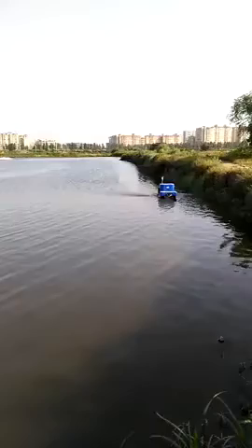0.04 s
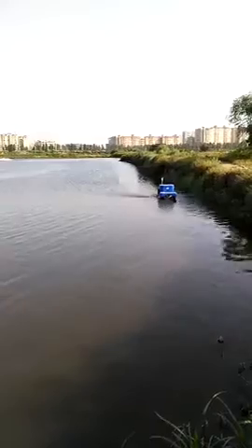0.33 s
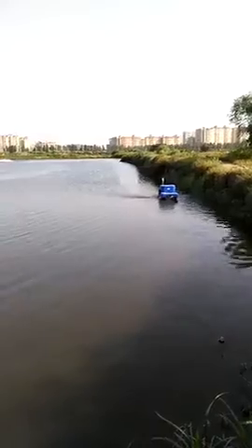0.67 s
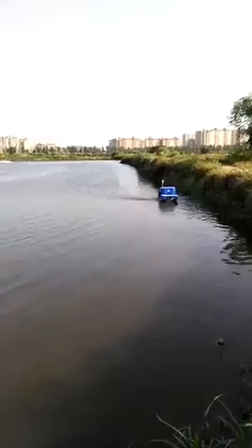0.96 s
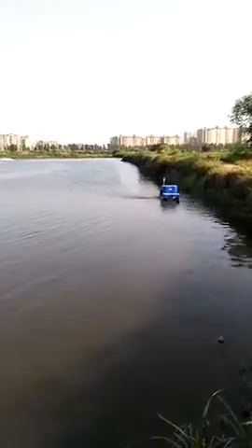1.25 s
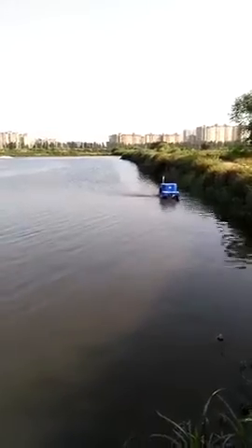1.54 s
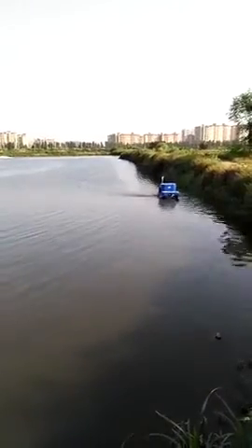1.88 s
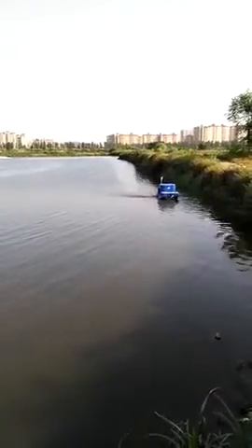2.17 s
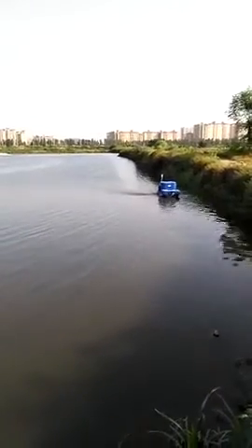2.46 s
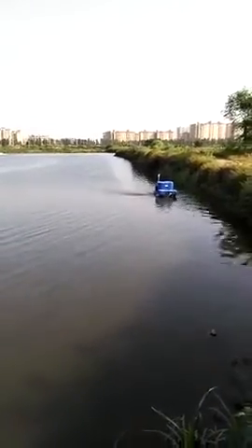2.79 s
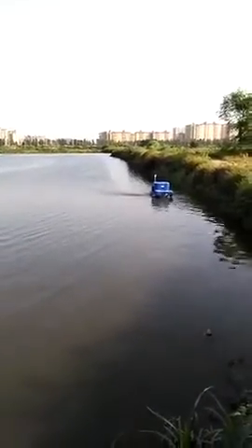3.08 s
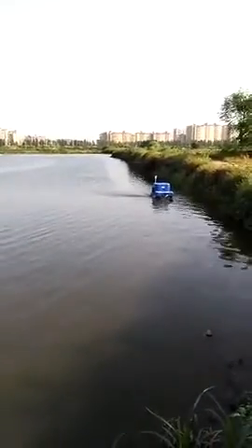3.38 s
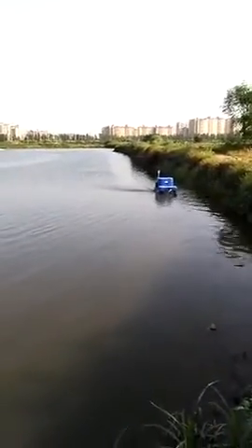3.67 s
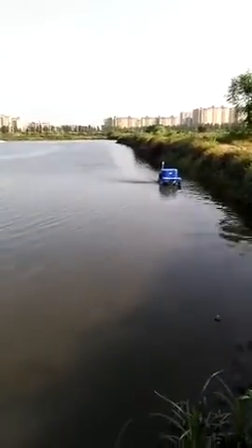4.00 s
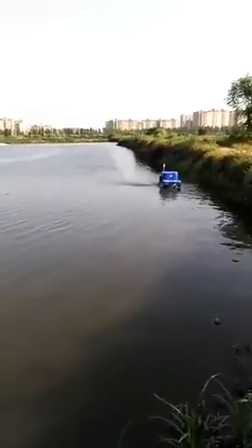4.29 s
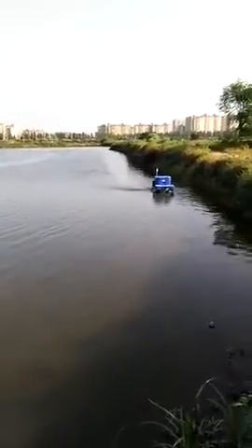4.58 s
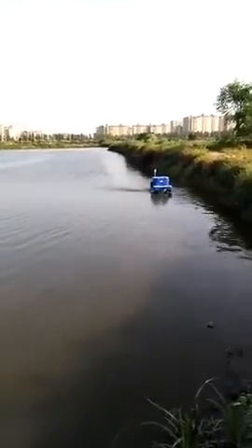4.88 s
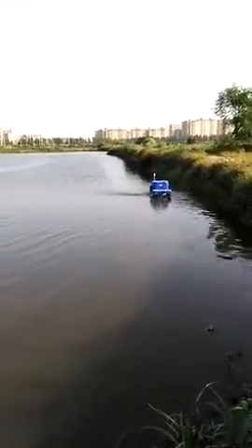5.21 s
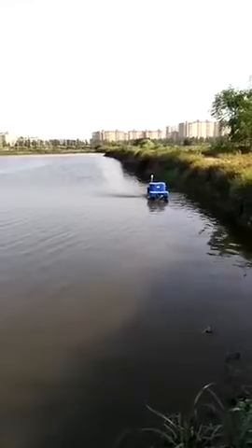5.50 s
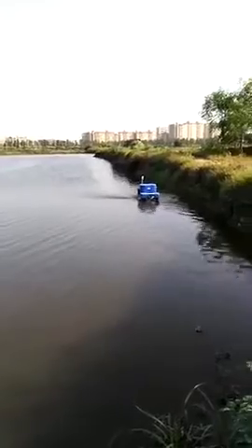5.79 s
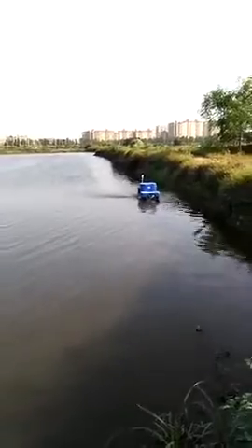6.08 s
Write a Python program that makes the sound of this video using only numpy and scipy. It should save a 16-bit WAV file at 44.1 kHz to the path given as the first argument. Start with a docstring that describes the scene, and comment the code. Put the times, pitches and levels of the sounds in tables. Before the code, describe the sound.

A motor-driven floating machine drones with a metallic chirr and a steady wash of spray on a pond, under low wind rumble.

```python
"""A steady wash of falling water, with a drone and a metallic chirr: a floating aerator on a pond.
Its jet falls back as lumps, drops and mist, close partials beat in its motor, and its shaft rubs
three times a turn and sets the metal ringing. Wind nudges the microphone on the bank, where insects
tick, grass rustles and water plops now and then. Midway the treble crackles faintly."""
import sys
import numpy as np
from scipy import signal
from scipy.fft import rfft, irfft
from scipy.io import wavfile
from scipy.ndimage import uniform_filter1d

SR = 44100
rng = np.random.default_rng(int(sys.argv[2]) if len(sys.argv) > 2 else 0)


def bounce(signal):
    """Save signal as a 16-bit WAV file at the path given by the first command-line argument."""
    frames = np.transpose(np.atleast_2d(signal))
    limited = np.clip(frames, -1, 1)
    pcm = np.round(limited * 32767).astype(np.int16)
    wavfile.write(sys.argv[1], SR, pcm)


N = 275625
T = np.arange(N) / SR
FREQ = np.maximum(np.fft.rfftfreq(N, 1 / SR), 1)


def undb(db):
    """Decibels to gain."""
    return 10 ** (np.asarray(db) / 20)


def unit(x):
    """Scale to rms 1."""
    return x / np.sqrt(np.mean(x ** 2))


def curves(table):
    """Automation lanes: each column after time_s, joined by straight lines."""
    times, *columns = np.transpose(table)
    return [np.interp(T, times, column) for column in columns]


def colour(x, points):
    """EQ a sound through points (freq_hz, gain_db), rolling off past the ends; rms 1."""
    hz, db = np.transpose(points)
    skirts = 1 / np.sqrt((1 + (hz[0] / FREQ) ** 4) * (1 + (FREQ / hz[-1] / 2) ** 4))
    eq = undb(np.interp(np.log(FREQ), np.log(hz), db))
    return unit(irfft(rfft(x) * skirts * eq, N))


def walk(rate_hz):
    """Smooth random modulator: noise low-passed at rate_hz; rms 1."""
    return unit(irfft(rfft(rng.standard_normal(N)) / (1 + (FREQ / rate_hz) ** 4) ** .5, N))


def angle(hz):
    """Phase that a frequency curve runs through."""
    return 2 * np.pi * np.cumsum(hz) / SR


def swells(table, attack_s, release_s):
    """Envelope of events (start_s, length_s, level_db) that rise, hold and die away."""
    return sum(undb(db) * np.clip((T - s) / attack_s, 0, 1)
               * np.exp(-np.maximum(T - s - length, 0) / release_s) for s, length, db in table)


def impacts(per_s, spread_db):
    """Random clicks of unequal size; rms 1."""
    hits = (rng.random(N) < per_s / SR) * np.sign(rng.standard_normal(N))
    return unit(hits * undb(spread_db * np.minimum(rng.exponential(size=N), 4)))


def blips(table, glide):
    """Swelling tones (centre_s, peak_db, pitch_hz, half_length_s); log pitch glides per half length."""
    out = np.zeros(N)
    for (s, db, hz, half), phase in zip(table, 2 * np.pi * rng.random(len(table))):
        near = np.abs(T - s) < 4 * half
        u = (T[near] - s) / half
        out[near] += undb(db) * np.exp(-u ** 2) * np.sin(angle(hz * np.exp(glide * u)) + phase)
    return out


# EQ of steady air on the microphone: freq_hz, gain_db
RUMBLE_EQ = [(25, -23), (35, -7.5), (50, -3.5), (70, -1), (100, -9), (150, -17), (250, -19), (500, -49)]
# strength of the breeze: time_s, level_db
BREEZE_LEVEL = [(0.6, -53), (3.6, -52.5), (4.5, -56), (5.3, -52), (6.25, -54)]
# eddies hitting the microphone: centre_s, peak_db, pitch_hz
WIND_THUMPS = [(0.676, -37.5, 56.5), (0.813, -38.5, 57.5), (0.925, -38.5, 64), (1.424, -34, 62.6),
               (1.557, -28, 65), (2.385, -32, 62), (2.597, -34.5, 59.6), (3.207, -43, 104),
               (3.504, -37, 71), (3.589, -31, 75), (3.667, -34.5, 77), (6.082, -42.5, 61.5),
               (6.17, -37.5, 98), (6.215, -42, 70)]


def wind(gust_db=3.5, flutter_db=-10.5, octave_db=-10, half_length_cycles=1.1):
    """A breeze rumbles on the microphone; single eddies thump it and break up into ragged flutter."""
    rumble = colour(rng.standard_normal(N), RUMBLE_EQ)
    rumble *= undb(curves(BREEZE_LEVEL)[0] + gust_db * walk(7.4))
    thumps = [(s, db, hz, half_length_cycles / hz) for s, db, hz in WIND_THUMPS]
    # the harder the thump, the more of its octave comes with it
    hardest_db = max(db for s, db, hz in WIND_THUMPS)
    octaves = [(s, 2 * db - hardest_db + octave_db, 2 * hz, half) for s, db, hz, half in thumps]
    eddies = sum(undb(db) * np.exp(-((T - s) / half / 2) ** 2) for s, db, hz, half in thumps)
    flutter_eq = [(48, 8.5), (100, 3), (200, -12), (400, -21.5), (1000, -42)]
    flutter = colour(rng.standard_normal(N), flutter_eq) * eddies * undb(flutter_db)
    return rumble + blips(thumps + octaves, glide=-0.066) + flutter


def crackle(start_s=2.74, end_s=3.54, pair_gap_s=0.0045, level_db=-81, count=12):
    """For a moment the treble crackles with tiny paired clicks."""
    slots = (np.arange(count) + rng.random(count)) / count
    clicks = np.zeros(N)
    clicks[((start_s + slots * (end_s - start_s)) * SR).astype(int)] = 1
    pairs = clicks + np.roll(clicks, int(pair_gap_s * SR))
    return colour(pairs, [(8000, -3), (11000, 0), (16000, -4)]) * undb(level_db)


# rustles on the bank: start_s, level_db, rise_s, decay_s, stalk_hz, treble_db
GRASS_RUSTLES = [(3.487, -44.5, 0.00065, 0.021, 4300, -0.5), (3.671, -49.5, 0.005, 0.026, 4250, 7),
                 (4.062, -46, 0.014, 0.04, 5140, 3), (4.605, -50, .003, 0.022, 3900, -10)]
# EQ of scraping blades: freq_hz, gain_db
GRASS_EQ = [(300, 9.5), (1000, 5.5), (2600, -14), (3600, -4), (5000, -2), (7000, -4), (10000, -6),
            (12000, -10), (15500, -20)]


def grass(stalk_db=-5, treble_hz=5500):
    """Dry blades scrape in short bursts of tiny clicks, and each stalk rings a little."""
    out = 0
    for s, db, rise, decay, stalk_hz, treble_db in GRASS_RUSTLES:
        age = np.maximum(T - s, 0)
        envelope = undb(db) * np.minimum(age / rise, 1) * np.exp(-np.maximum(age - rise, 0) / decay)
        eq = [(hz, gain_db + treble_db * (hz > treble_hz)) for hz, gain_db in GRASS_EQ]
        scrape = colour(impacts(per_s=3500, spread_db=2), eq)
        stalk = undb(stalk_db) * walk(370) * np.sin(2 * np.pi * stalk_hz * T)
        out += envelope * (scrape + stalk)
    return out


# insect ticks, before rasp and trim: centre_s, level_db, pitch_hz
INSECT_TICKS = [(0.989, -68, 5200), (1.356, -53, 5770), (1.612, -58, 5630), (1.738, -48.5, 5660),
                (1.829, -58, 5400), (2.111, -63, 5200), (2.238, -61, 4640), (2.691, -54, 5300),
                (3.196, -51, 3960)]


def insects(half_length_s=0.0054, rough_db=4.5, trim_db=-2):
    """Each tick is a very short, raspy chirp that falls in pitch."""
    rasp = unit(np.cos(walk(250)) * undb(rough_db * walk(200)))
    chirps = blips([(s, db, hz, half_length_s) for s, db, hz in INSECT_TICKS], glide=-0.0224)
    return chirps * rasp * undb(trim_db)


# water against the bank: centre_s, peak_db, pitch_hz, half_length_s
BANK_PLOPS = [(1.068, -53.5, 2400, 0.005), (2.078, -64.5, 3000, 0.014), (2.332, -52, 2420, 0.0044),
              (2.459, -51.5, 2430, .005), (3.47, -49.5, 1340, 0.0071), (3.4905, -41.5, 1016, 0.0031),
              (5.338, -44, 900, 0.011)]


def plops():
    """Water plops against the bank in short, rising tones."""
    return blips(BANK_PLOPS, glide=0.0248)


# partials of the drone: pitch_hz, relative_db
MOTOR_PARTIALS = [(183, -17.5), (359, -16.5), (382, -1), (405.3, -5.5), (454, -16), (740.5, -20),
                  (764.2, -12.5), (787.5, -15), (811, -31)]
# swells over the steady drone: start_s, length_s, level_db
MOTOR_SWELLS = [(0.865, 0.02, -49), (1.062, 0.078, -56), (1.292, 0.083, -47.5), (1.494, .06, -51.5),
                (1.953, 0.13, -50.5), (2.582, 0.042, -46.5), (3.002, 0.034, -45), (3.213, .085, -49),
                (4.052, 0.055, -46), (4.307, 0.062, -51), (4.528, 0.041, -49.5), (4.892, 0.056, -53),
                (5.13, 0.1, -51.5), (5.359, 0.046, -51), (5.535, 0.092, -50.5), (5.826, 0.056, -49),
                (5.96, 0.11, -51), (6.18, 0.054, -47.5)]


def motor(steady_db=-55.5, drift_db=2.5, sag_db=-4.5, sag_s=0.044, waver_hz=1.45, flutter_db=2.6):
    """Close partials, a shaft rate apart, beat against each other; the load makes them waver."""
    load = walk(4.9)
    tone = 0
    for hz, db in MOTOR_PARTIALS:
        gain = undb(db + flutter_db * walk(5.7))
        phase = angle(hz + waver_hz * (load + walk(11.7))) + 2 * np.pi * rng.random()
        tone += gain * np.sin(phase)
    # level out the slow movement and keep the quick beating
    tone /= np.sqrt(uniform_filter1d(tone ** 2, size=SR // 11))
    # the drone sags just before each swell
    sag = sum(np.exp(-((T - s + sag_s) / sag_s) ** 2) for s, length, db in MOTOR_SWELLS)
    steady = undb(steady_db + sag_db * sag + drift_db * walk(8))
    return tone * np.hypot(steady, swells(MOTOR_SWELLS, attack_s=0.018, release_s=0.023))


def chirr(modes, turn, sharpness, uneven, scatter_db, bend_hz, wander_hz, rubs_per_turn=3):
    """Each rub swells the metal modes and pulls their pitch up; one rub of the turn is weaker."""
    press = np.cos(rubs_per_turn * turn)
    accent = 1 + uneven * np.cos(turn + np.pi / rubs_per_turn)
    pulses = np.exp(sharpness * press) * accent
    out = 0
    for hz, width, db, rasp_db in modes:
        phase = angle(hz + bend_hz * press + wander_hz * walk(23.2))
        rasp = walk(width / 2) * np.cos(phase) + walk(width / 2) * np.sin(phase)
        ring = unit(np.sin(phase)) + undb(rasp_db) * unit(rasp)
        out += undb(db) * unit(pulses * undb(scatter_db * walk(15)) * ring)
    return unit(out)


# shaft speed: time_s, turns_per_s
SHAFT_SPEED = [(0.6, 23.3), (2.4, 23.25), (2.9, 22.9), (3.4, 23.1), (4.0, 22.7), (4.9, 22.9), (5.4, 23.25),
               (6.25, 23.2)]
# how hard the shaft rubs, each lane played relative to its median: time_s, chirr_db, squeal_db
RUB_PRESSURE = [(0.68, -69, -78), (0.93, -59, -64), (1.22, -60, -69), (1.49, -60, -56), (1.67, -63, -73),
                (1.78, -58, -64), (1.87, -58.5, -60), (2.2, -65.5, -78), (2.34, -56.5, -61),
                (2.9, -61.5, -69), (3.05, -56.5, -57), (3.12, -59, -66), (3.44, -60.5, -60),
                (4.31, -58.5, -67), (4.7, -66.5, -74), (4.79, -60, -57.5), (4.88, -65, -68.5),
                (6.25, -56, -59)]
# the shaft grabs and the low modes flare up: start_s, length_s, level_db
SHAFT_GRABS = [(1.69, .13, -63.5), (2.255, 0.25, -54), (2.63, 0.097, -56.5), (3.85, 0.2, -58)]
# three banks of metal modes: pitch_hz, rasp_width_hz, relative_db, rasp_to_tone_db
LOW_METAL = [(6095, 99, -8, -5), (6170, 100, -6.5, 10), (6858, 300, 0, -2), (7250, 670, -11, 9)]
SQUEAL_METAL = [(8400, 47, -2, -0.5), (8580, 230, -10.5, -3), (7850, 1400, -14.5, 6)]
HIGH_METAL = [(9039, 240, 0, 2), (9675, 220, -1, 0), (9884, 200, -5, 3), (10266, 200, -1.5, 1),
              (10578, 140, -11, 3), (11526, 600, -13, 12), (13458, 260, -16, 8), (14002, 350, -15.5, 8)]


def shaft(low_db=-62, squeal_db=-61.5, high_db=-61, low_follow=0.93, squeal_follow=0.9, high_follow=1.48):
    """The turning shaft rubs: two banks of modes chirr, and a third squeals in clear pulses."""
    turn = angle(curves(SHAFT_SPEED)[0])
    low = chirr(LOW_METAL, turn + 1, sharpness=0.26, uneven=0.03,
                scatter_db=2.5, bend_hz=55, wander_hz=8.98)
    squeal = chirr(SQUEAL_METAL, turn, sharpness=0.9, uneven=0.5,
                   scatter_db=2.3, bend_hz=60, wander_hz=8)
    high = chirr(HIGH_METAL, turn + 0.5, sharpness=0.083, uneven=0.031,
                 scatter_db=1.5, bend_hz=71, wander_hz=9.14)
    grabs = swells(SHAFT_GRABS, attack_s=0.027, release_s=0.038)
    # each bank follows the rubbing by its own dB per dB
    pressure_db, squealing_db = (db - np.median(db) for db in curves(RUB_PRESSURE))
    low *= np.hypot(undb(low_db + low_follow * pressure_db), grabs)
    squeal *= undb(squeal_db + squeal_follow * squealing_db)
    high *= undb(high_db + high_follow * pressure_db)
    return low + squeal + high


def bubbles(per_s, low_hz, high_hz, cycles, spread_db):
    """Air dragged under rings in pockets that rise in pitch as they surface; rms 1."""
    out = np.zeros(N + SR)
    for when, pitch, chance, life in rng.random((int(per_s * N / SR), 4)):
        hz = low_hz * (high_hz / low_hz) ** pitch
        decay_s = cycles * (.5 + life) / hz / np.pi
        age = np.arange(min(int(2 * np.pi * decay_s * SR), SR)) / SR / decay_s  # in decay times
        size = undb(spread_db * min(-np.log(1 - chance), np.pi)) * np.sqrt(hz)
        start = int(when * N)
        out[start:start + len(age)] += size * np.exp(-age) * np.sin(angle(hz * (1 + 0.023 * age)))
    return unit(out[:N])


# fader rides for the heavy water and the thrown drops, before each layer's trim: time_s, level_db
HEAVY_WATER = [(0.68, -50), (0.69, -49), (1.11, -54), (3.68, -55.5), (5.22, -53), (6.2, -54.5)]
THROWN_DROPS = [(0.68, -66.5), (1.22, -65), (2.06, -72), (2.55, -62.5), (2.76, -65), (2.88, -59.5),
                (3.51, -65.5), (3.57, -67), (4.49, -61.5), (5.61, -59.5), (6.2, -64)]
# EQ of the four spray layers: freq_hz, gain_db
WASH_EQ = [(90, -3), (170, -4), (320, 0), (430, 1), (550, 0.5), (700, 0.5), (1080, -1.5), (1270, -15),
           (1450, -13), (2000, -22), (3200, -38)]
PATTER_EQ = [(900, -4.5), (1400, 4.5), (1850, -4), (2250, 6), (2600, 2.5), (2900, -3.5), (3150, -25),
             (3700, -27), (5000, -38)]
SIZZLE_EQ = [(3500, -44), (4000, -5), (4300, -7.5), (4900, 0.5), (5500, 0), (6500, -18), (7300, -6.5),
             (10400, -4), (11000, -15.5)]
MIST_EQ = [(3000, 5), (4100, -1), (4800, -3.5), (6000, -1), (10400, 2.5), (11000, -6.5), (12500, -9),
           (14200, -12), (15700, -7)]


def spray(wash_db=0.31, patter_db=1.5, surge_db=1, coarsen_mid_s=4.05, coarsen_span_s=0.81,
          early_sizzle_db=-14, late_sizzle_db=-1, early_mist_db=0.5, late_mist_db=-11):
    """The jet falls back: lumps of water make the wash, drops patter, droplets sizzle, mist hisses."""
    heavy_db, = curves(HEAVY_WATER)
    drop_db, = curves(THROWN_DROPS)
    gurgle = bubbles(per_s=330, low_hz=420, high_hz=1400, cycles=20, spread_db=3.5)
    tinkle = bubbles(per_s=600, low_hz=1300, high_hz=3000, cycles=24, spread_db=4)
    wash = colour(impacts(per_s=2500, spread_db=3) + undb(-12) * gurgle, WASH_EQ)
    wash *= undb(heavy_db + wash_db + surge_db * walk(8.4))
    patter = colour(impacts(per_s=6000, spread_db=1) + undb(-9.5) * tinkle, PATTER_EQ)
    patter *= undb(drop_db + patter_db + surge_db * walk(4.3))
    # the finest spray rides with the drops and crossfades from misty hiss to sizzle
    coarse = np.clip((T - coarsen_mid_s) / coarsen_span_s + .5, 0, 1)
    sizzle_db = drop_db + early_sizzle_db * (1 - coarse) + late_sizzle_db * coarse
    mist_db = drop_db + early_mist_db * (1 - coarse) + late_mist_db * coarse
    sizzle = colour(impacts(per_s=16000, spread_db=6), SIZZLE_EQ) * undb(sizzle_db + 0.95 * walk(28))
    mist = colour(rng.standard_normal(N), MIST_EQ) * undb(mist_db)
    return wash + patter + sizzle + mist


def scene():
    """Open water gives no echo: all sources simply add, in mono."""
    aerator = motor() + shaft() + spray()
    return (aerator + plops() + wind() + insects() + grass() + crackle())[None]


def record(dry):
    """The microphone switches on after a moment, and a steep low-pass cuts the top."""
    start_s, top_hz = 0.621, 15600
    low_pass = signal.ellip(10, .2, 70, top_hz, fs=SR, output="sos")
    return signal.sosfilt(low_pass, dry * (T >= start_s))


dry = scene()
out = record(dry)
bounce(out)
```